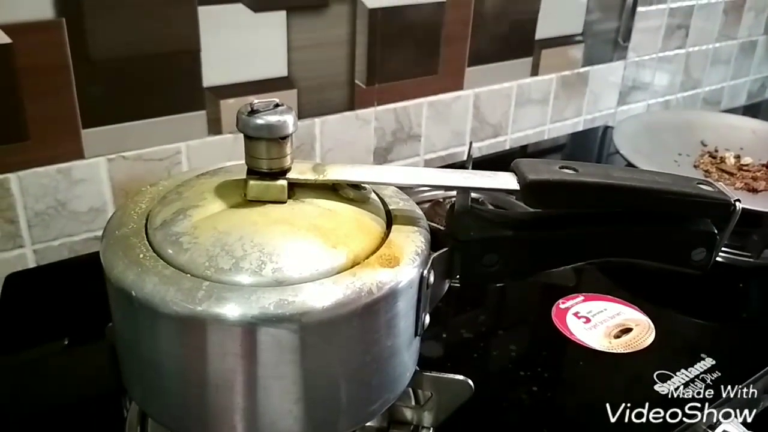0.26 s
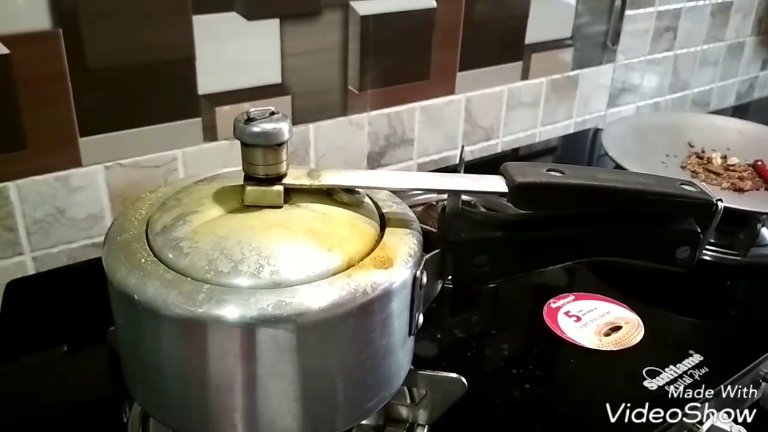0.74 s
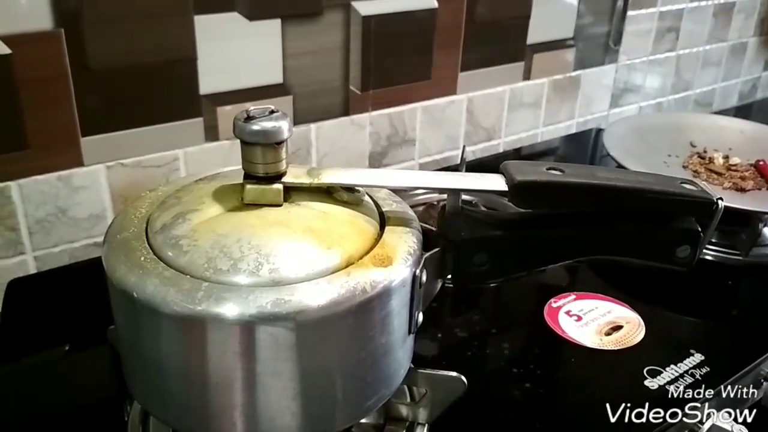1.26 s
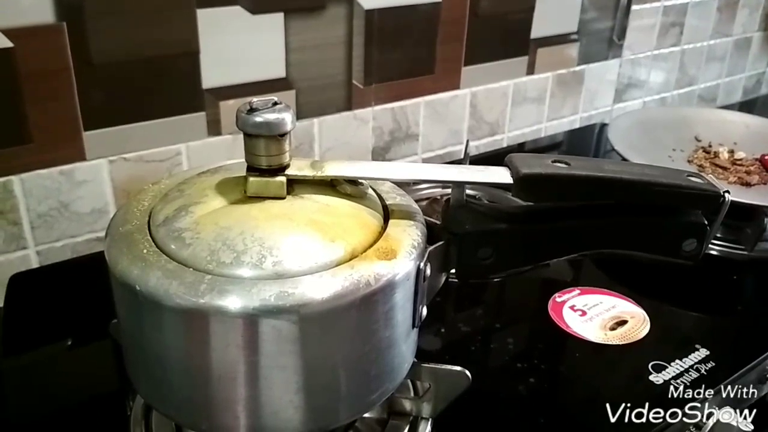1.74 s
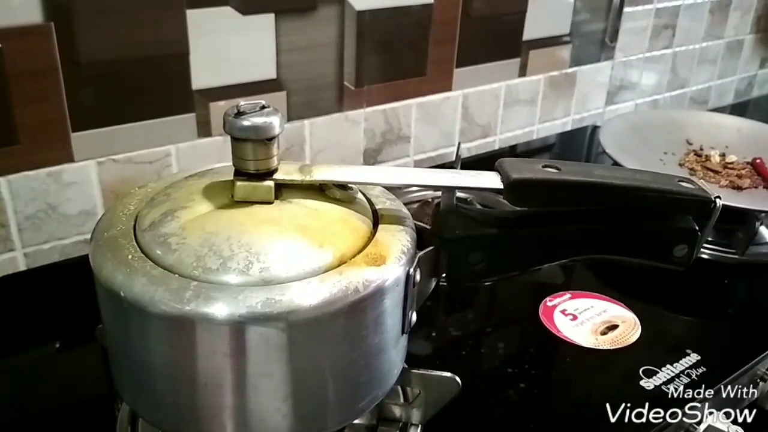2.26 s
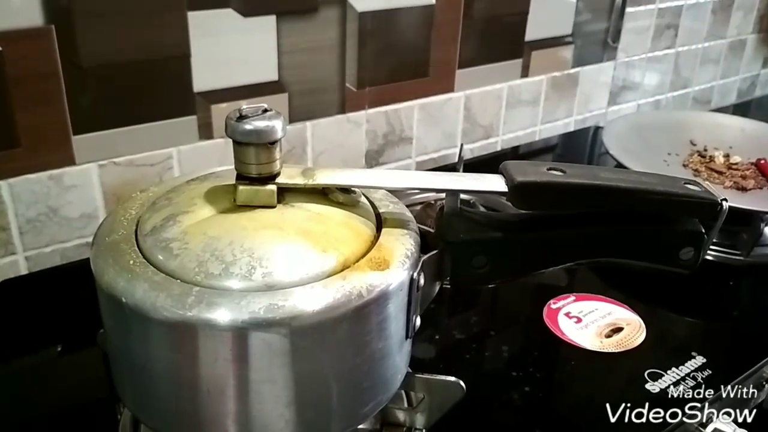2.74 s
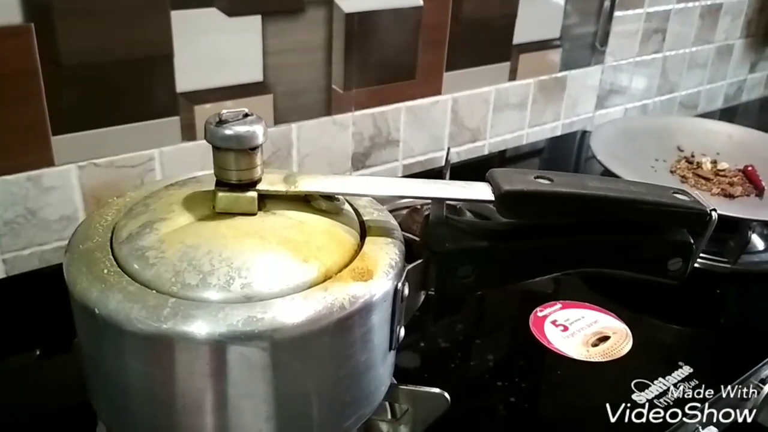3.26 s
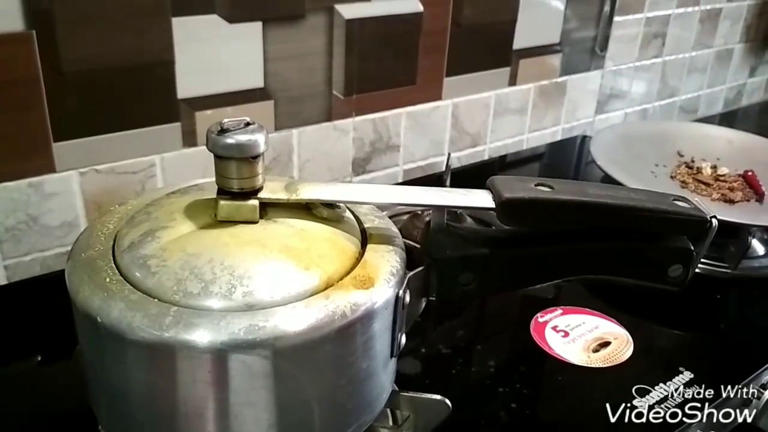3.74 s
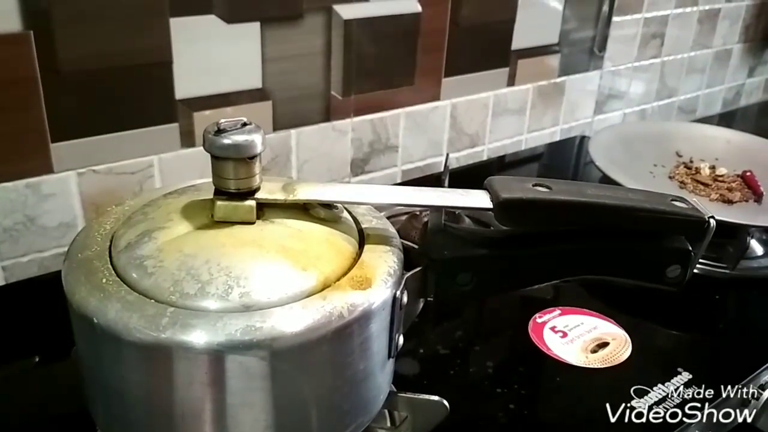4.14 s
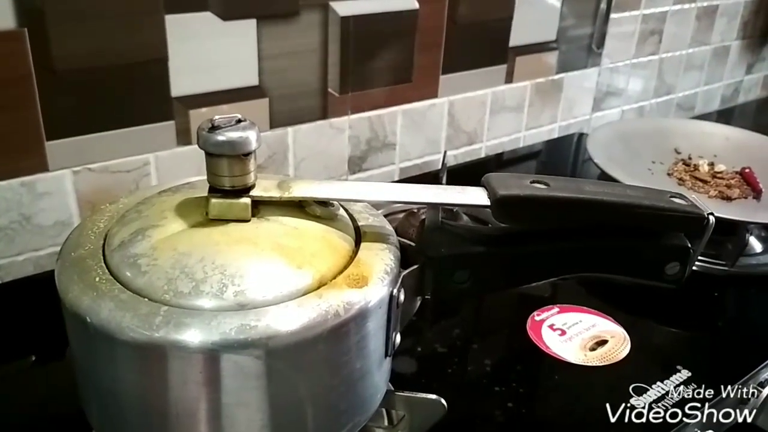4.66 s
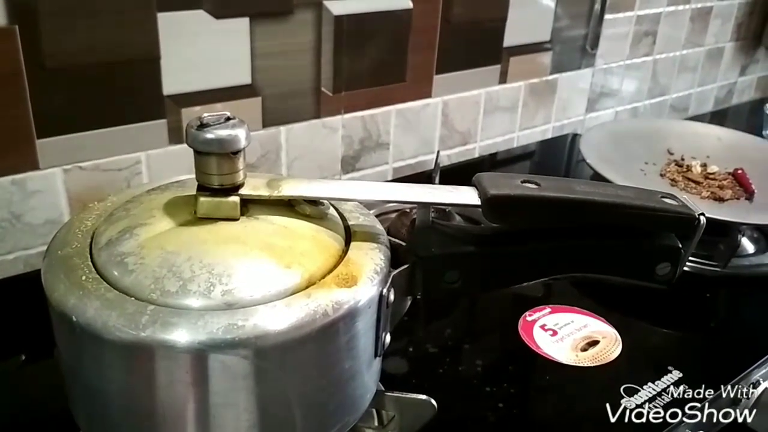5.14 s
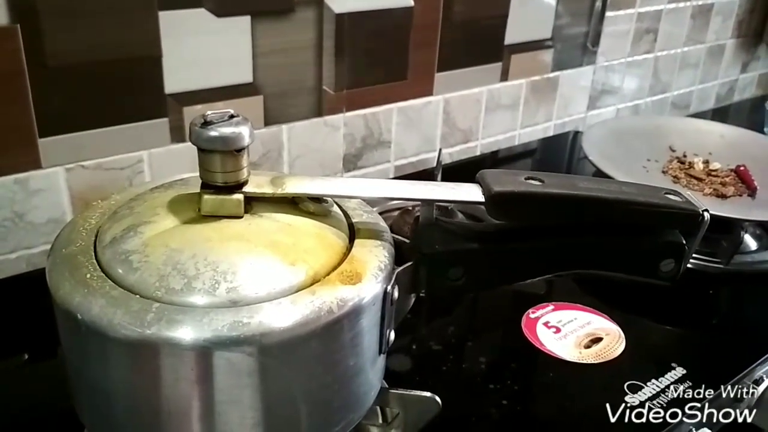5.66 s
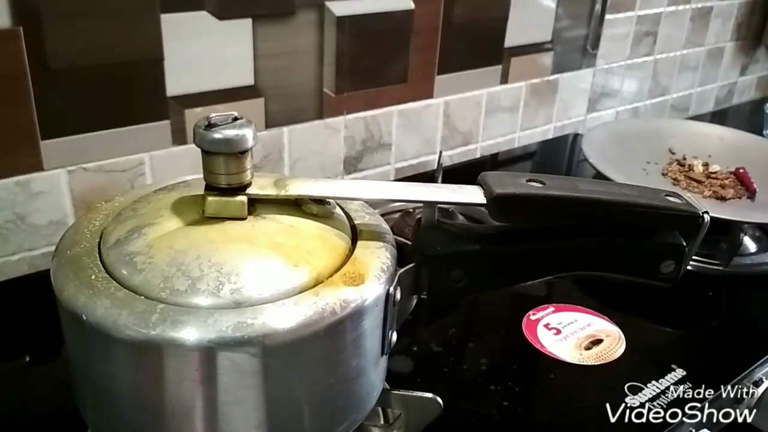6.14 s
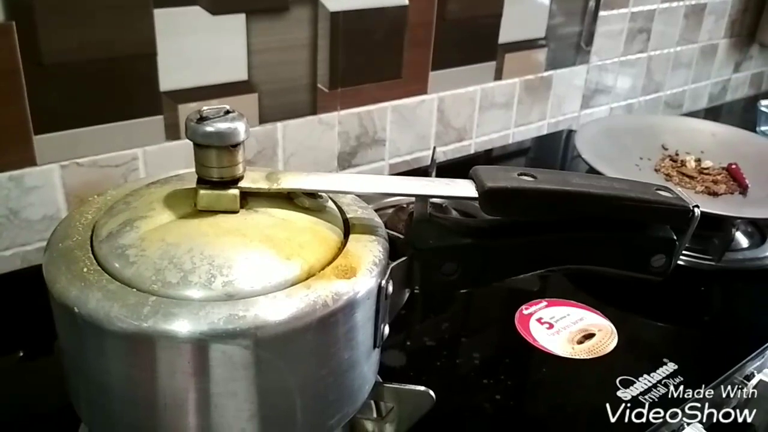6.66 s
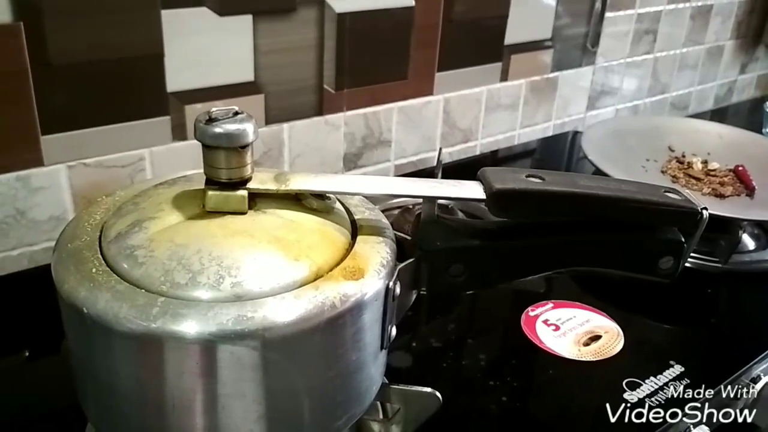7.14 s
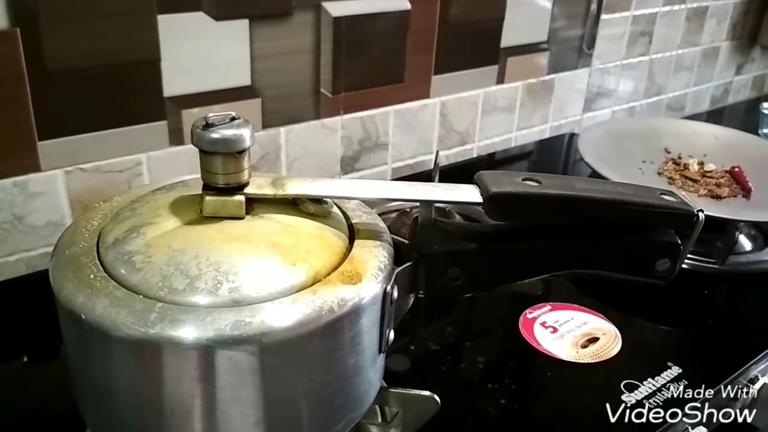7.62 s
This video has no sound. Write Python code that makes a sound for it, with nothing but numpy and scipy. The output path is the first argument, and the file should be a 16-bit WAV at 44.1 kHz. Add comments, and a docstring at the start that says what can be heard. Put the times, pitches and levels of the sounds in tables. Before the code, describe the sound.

From 0 to about 7.9 seconds a pressure cooker releases steam in a continuous, dense, bright hiss, close and wide in stereo, with a broad treble body and a sharp airy band on top. For the first half second it is slightly thinner; then it stays nearly even, swelling a touch from about 4.4 seconds. Underneath, very quietly, a gas flame flutters, tiny low bubbling blips scatter, and room air and rumble flicker with brief dropouts. A soft knock comes at 1.3 seconds. A faint far horn sounds around 2.8 to 3.4 and more clearly at 4.25. Bumps occur near 4.8 and 6.2, and wet spitting puffs at 5.4, 5.9 and 6.6. Dull floor thuds cluster from 6.8 to 7.1, strongest about 6.9, while a distant motor whine rises faintly until the end. The hiss is cut off still running.

```python
"""A tiled kitchen: steam hisses from the weight valve of a pressure cooker, close to a phone with two microphones.
The hiss, wet surges, flame, house rumble and room air are shaped noise whose levels swell and flutter.
Soft low blips are short gliding tones scattered at random; thuds ring the floor with decaying sines.
A far horn and a motor whine are unsteady tones. The low end flickers and a noise suppressor mutes faint cells."""
import sys
import numpy as np
from scipy import signal
from scipy.fft import rfft, irfft, next_fast_len
from scipy.io import wavfile
from scipy.ndimage import uniform_filter1d, map_coordinates

SR = 44100
rng = np.random.default_rng(int(sys.argv[2]) if len(sys.argv) > 2 else 0)


def undo_db(level):
    """Turn decibels back into plain size, where 20 dB means ten times bigger."""
    steps = np.asarray(level, float) / 20
    return 10 ** steps


def generate_wav(sig):
    """Save sig (samples, or channels by samples) to the path in sys.argv[1] as 16-bit PCM at SR."""
    pcm = np.round(np.clip(np.atleast_2d(sig).T, -1, 1) * 32767).astype(np.int16)
    wavfile.write(sys.argv[1], SR, pcm)


N = 347949  # length in samples


def unit(x):
    """Scale to rms 1."""
    return x / np.sqrt(np.mean(x ** 2) + 1e-20)


def along(points, hz):
    """Read (frequency, value) points on a log frequency axis."""
    f, v = np.transpose(points)
    return np.interp(np.log(hz + 1), np.log(f + 1), v)


def curves(rows):
    """One value per sample for each column after the time."""
    s, *cols = np.transpose(rows)
    return [np.interp(np.arange(N) / SR, s, c) for c in cols]


def wobble(rate):
    """A smooth random curve, rate knots a second."""
    return map_coordinates(rng.standard_normal(N // 100), [np.arange(N) * rate / SR])


def filtered(x, response):
    """Shape the spectrum of x by a gain that depends on frequency."""
    m = next_fast_len(N + 8192)
    return irfft(rfft(x, m) * response(np.fft.rfftfreq(m, 1 / SR)), m)[..., :N]


def rush(spectrum, alike, patchy_db):
    """Stereo noise of mid rms 1 with patches of random gain; alike is the left-right likeness."""
    z = signal.stft(rng.standard_normal((2, N)), nperseg=512)[2]
    field = uniform_filter1d(rng.standard_normal(z.shape), size=5, axis=1)
    field = uniform_filter1d(field, size=10, axis=2)
    pair = signal.istft(z * undo_db(patchy_db * unit(field)), nperseg=512)[1][:, :N]
    a, b = filtered(pair, lambda hz: undo_db(along(spectrum, hz)))
    turn = np.arccos(np.clip(alike, -1, 1)) / 2
    common, apart = np.cos(turn) * a, np.sin(turn) * b
    pair = np.array([common + apart, common - apart])
    return pair / np.std(pair.mean(0))


def swells(rows, mean_db, swing_db, rate):
    """Level in dB: the loudest swell of the moment, or else a random murmur with rate knots a second."""
    rise, sag, fall = 518, 30.5, 483  # dB per s: before the start, from the start on, extra after the length
    start_s, length_s, level_db = np.transpose(rows)[..., None]
    t = np.arange(0, N, 64) / SR
    since = t - start_s
    lost_db = rise * np.maximum(-since, 0) + sag * np.maximum(since, 0)
    lost_db = lost_db + fall * np.maximum(since - length_s, 0)
    loudest_db = np.interp(np.arange(N) / SR, t, (level_db - lost_db).max(axis=0))
    return np.maximum(loudest_db, mean_db + swing_db * wobble(rate))


def rippled(x):
    """Kitchen echoes ripple the hiss: narrow, slowly shifting patches of gain, different at each port."""
    ripple_db, top_hz = 2.8, 11000  # depth, and where it fades out
    hz, t, z = signal.stft(x, SR, nperseg=2048)
    field = uniform_filter1d(rng.standard_normal(z.shape), size=3, axis=1)
    field = uniform_filter1d(field, size=6, axis=2)
    depth_db = (ripple_db / (1 + (hz / top_hz) ** 10))[:, None]
    gain_db = depth_db * unit(field) - .1 * depth_db ** 2  # the second term offsets the added power
    return signal.istft(z * undo_db(gain_db), SR, nperseg=2048)[1][:, :N]


# Course of the jet: (time [s], level before trim and flutter [dB], left-right balance before centring [dB])
STEAM_COURSE = [(0.0, -45, -5.5), (1.32, -45, -4.5), (1.45, -43, -5.0), (1.65, -44, -6.0),
                (2.02, -44, -4.5), (2.5, -45, -5.0), (2.77, -43, -4.5), (4.04, -43, -5.5),
                (4.42, -41, -5.5), (4.61, -42, -6.5), (4.9, -42, -4.5), (5.21, -43, -6.5),
                (7.03, -43, -7.5), (7.08, -44, -7.0), (7.45, -42, -7.5), (7.71, -43, -6.5),
                (7.89, -44, -7.5)]
# Colour of the bright jet: (frequency [Hz], relative density [dB per Hz])
JET_COLOUR = [(5060, -34), (8600, -29.5), (9390, -19), (10800, -3), (12000, -0.5), (14500, -7),
              (15700, -20)]
# Colour of the broad hiss around the lid: (frequency [Hz], relative density [dB per Hz])
LID_COLOUR = [(880, -28), (1500, -11), (2170, -4), (2470, -4), (2710, -5), (3090, -4), (3490, 0),
              (3800, -1), (4300, 0), (5050, -1.5), (6020, -5), (6760, -4.5), (7410, 1), (8380, 0.5),
              (9400, -4), (12200, -20.5), (20700, -120)]
# Narrow parts cancelled by walls and lid: (centre [Hz], width [Hz], depth before the overall lift [dB])
WALL_NOTCHES = [(2640, 90, 2), (3110, 110, 2.5), (3800, 140, 2), (4760, 160, 2.5), (5560, 90, 1.5),
                (5950, 280, 3.5), (6480, 110, 2), (6900, 240, 3), (7850, 100, 2.5), (8150, 110, 3),
                (8450, 140, 4), (8610, 70, 4), (9170, 100, 2.5), (9560, 90, 1.5)]
# A reflection hollows the hiss and fills in as the hand drifts: (time [s], depth [dB])
HOLLOW_COURSE = [(0, 3), (2.2, 4), (3.2, 2), (5.5, 0.5), (6.6, -0.5), (7.89, 0.5)]


def steam():
    """Turbulent jet: a bright band from the valve gap and a broad lid hiss; both flutter with the flow."""
    jet_db, pan_db = curves(STEAM_COURSE)
    turn_db = pan_db - np.mean(pan_db)  # the hand turns the phone a little
    # the lid hiss follows the jet, steeper than it moves, and the turning
    lid_db = -51 + 1.39 * (jet_db - np.mean(jet_db)) + 0.36 * turn_db
    flutter_db = .3 * wobble(9)
    sway = undo_db(np.outer([.5, -.5], turn_db))
    jet_db = jet_db - 1.14 + 0.53 * flutter_db + 0.14 * wobble(25)
    jet = undo_db(jet_db) * sway * rush(JET_COLOUR, 0.12, patchy_db=1.0)
    lid_db = lid_db + flutter_db + 0.15 * wobble(25)
    lid = undo_db(lid_db) * rush(LID_COLOUR, 0.034, patchy_db=1.12)

    def echoes(hz):
        """Gain of the wall and lid notches, lifted a little overall."""
        return undo_db(0.56 - sum(db * np.exp(-(2 * (hz - c) / w) ** 2) for c, w, db in WALL_NOTCHES))

    hiss = filtered(jet + lid, echoes)
    hollow_hz, hollow_width_hz = 2957, 654
    hollow = filtered(hiss, lambda hz: np.exp(-(2 * (hz - hollow_hz) / hollow_width_hz) ** 4))
    hollow_gain = undo_db(-curves(HOLLOW_COURSE)[0])
    return rippled(hiss + (hollow_gain - 1) * hollow)


# Spurts at the lid: (start [s], length [s], level before flutter [dB])
LID_SPURTS = [(1.472, 0.039, -68.5), (2.08, 0.015, -70), (3.93, 0.08, -64.5), (4.396, 0.056, -66),
              (4.81, 0.044, -77), (4.883, 0.17, -65), (5.01, 0.3, -65), (5.431, 0.23, -55.5),
              (5.718, 0.064, -64.5), (5.893, 0.12, -59), (6.125, 0.018, -66.5), (6.51, 0.069, -66),
              (6.606, 0.25, -59.5), (7.224, 0.042, -61.5), (7.52, 0.057, -65), (7.588, 0.037, -62.5)]
# Colour of the sputter: (frequency [Hz], relative density [dB per Hz])
SPUTTER_COLOUR = [(700, -62), (950, -14), (1200, -4.5), (1600, -2.5), (2100, -7), (2600, -48)]


def sputter():
    """Steam spits at the lid: mid-band noise in short spurts over a faint murmur."""
    level_db = swells(LID_SPURTS, mean_db=-76, swing_db=4.6, rate=22) + 1.46 * wobble(14)
    return undo_db(level_db) * rush(SPUTTER_COLOUR, 0.21, patchy_db=6.5)


# Rough surges of wet steam: (start [s], length [s], level before flutter [dB])
WET_SURGES = [(6.596, 0.07, -67.5), (6.672, 0.09, -66), (6.757, 0.067, -62), (5.503, 0.092, -65.5),
              (7.298, 0.044, -75), (7.434, 0.09, -69)]
# Colour of the wet steam: (frequency [Hz], relative density [dB per Hz])
WET_COLOUR = [(300, -56), (450, 1.5), (600, -5), (900, 7.5), (1150, 4), (1400, -1.5), (2000, 0),
              (2600, -31)]


def surges():
    """Wet steam surges roughly: noise with a fast level flutter."""
    level_db = swells(WET_SURGES, mean_db=-95, swing_db=1, rate=10) + 2.6 * wobble(76)
    return undo_db(level_db) * rush(WET_COLOUR, 0.39, patchy_db=1.5)


# Level of the blips by pitch: (frequency [Hz], gain [dB])
BLIP_COLOUR = [(150, -2.5), (290, 0.5), (480, -7), (650, -2), (1000, 2.5), (1400, 0.5)]


def blips():
    """Short, slightly gliding soft tones of scattered low pitch, each panned at random."""
    per_s, low_hz, high_hz, mean_life_s = 55, 150.1, 1410, 0.0535
    weakest_db, scatter_db = -79.5, 13  # before the gain by pitch
    t = np.arange(SR // 8) / SR
    rows = rng.random((round(per_s * N / SR), 5))
    out = np.zeros((2, N + SR))
    for when, pitch, life, strength, side in rows:
        hz = low_hz * (high_hz / low_hz) ** pitch
        u = np.minimum(t / (mean_life_s * (.5 + life)), 1)  # 0 to 1 over the blip's life
        blip = np.sin(np.pi * u) ** 2 * np.sin(2 * np.pi * hz * t * (1 + 0.029 * u))
        turn = side * np.pi / 2
        pan = [np.cos(turn), np.sin(turn)]
        level = undo_db(along(BLIP_COLOUR, hz) + weakest_db + scatter_db * strength)
        out[:, round(when * N):][:, :len(t)] += level * np.outer(pan, blip)
    return out[:, :N]


# Flares of the gas flame: (start [s], length [s], level before flutter [dB])
FLAME_FLARES = [(0.71, 0.061, -60), (1.879, 0.032, -66), (2.044, 0.12, -65.5), (2.344, 0.042, -68),
                (2.727, 0.096, -67), (2.857, 0.041, -68.5), (3.145, 0.08, -72.5), (3.254, 0.011, -67.5),
                (3.32, 0.041, -71), (3.617, 0.16, -64.5), (4.38, 0.17, -64.5), (4.858, 0.059, -66.5),
                (5.06, 0.019, -71.5), (5.34, 0.053, -63.5), (5.48, 0.034, -74), (6.157, 0.046, -66.5),
                (6.23, 0.072, -66.5), (6.465, 0.043, -70), (6.596, 0.027, -74), (6.68, 0.03, -79),
                (6.757, 0.051, -73), (6.85, 0.18, -68.5), (7.215, 0.15, -65.5), (7.441, 0.24, -63)]
# Colour of the flame: (frequency [Hz], relative density [dB per Hz])
FLAME_COLOUR = [(200, -49), (350, -7.5), (550, -30.5), (670, -11.5), (740, 3.5), (810, -7.5), (900, -12),
                (1100, -71), (1500, -68)]


def flame():
    """Gas flame: a narrow rush that flares and flutters, mostly unlike at the two ports."""
    level_db = swells(FLAME_FLARES, mean_db=-85.5, swing_db=4.5, rate=21) + 5.05 * wobble(9.7)
    return undo_db(level_db) * rush(FLAME_COLOUR, 0.16, patchy_db=4.5)


# Bumps in the house: (start [s], length [s], level before flutter [dB])
HOUSE_BUMPS = [(0.164, 0.12, -63.5), (0.39, 0.05, -68.5), (0.67, 0.04, -71), (0.973, 0.055, -67),
               (1.3, 0.022, -59), (2.137, 0.013, -60), (2.248, 0.043, -73), (2.303, 0.047, -66),
               (2.398, 0.037, -67), (2.452, 0.034, -69), (2.886, 0.03, -67), (3.302, 0.017, -61),
               (3.4, 0.064, -63.5), (3.96, 0.033, -69.5), (4.17, 0.049, -64), (4.257, 0.041, -64.5),
               (4.545, 0.029, -61.5), (4.699, 0.02, -65.5), (4.815, 0.11, -52), (4.976, 0.059, -59),
               (5.408, 0.071, -63.5), (5.464, 0.079, -69.5), (5.673, 0.11, -62.5), (6.053, 0.021, -69),
               (6.167, 0.064, -58.5), (6.23, 0.046, -55.5), (6.31, 0.14, -66), (6.547, 0.023, -66.5),
               (6.657, 0.063, -56), (6.753, 0.16, -65.5), (7.09, 0.039, -75), (7.193, 0.035, -73),
               (7.231, 0.039, -67.5), (7.417, 0.18, -64), (7.54, 0.053, -68), (7.61, 0.033, -65.5)]
# Colour of the bumps: (frequency [Hz], relative density [dB per Hz])
BUMP_COLOUR = [(110, -32), (170, 0.5), (230, 4.5), (300, 3.5), (380, -18), (520, -45.5)]


def bumps():
    """Bumps in the house: lumps of low noise, largely alike at both ports."""
    level_db = swells(HOUSE_BUMPS, mean_db=-81, swing_db=1.7, rate=12) + 0.2 * wobble(13.0)
    return undo_db(level_db) * rush(BUMP_COLOUR, 0.77, patchy_db=3.5)


# Thuds through the floor: (time [s], level before a 7.5 dB trim [dB])
FLOOR_THUDS = [(1.3, -54), (1.33, -68), (6.779, -43), (6.807, -37), (6.851, -42), (6.891, -30),
               (6.928, -26), (6.961, -41), (7.018, -40), (7.111, -48)]
# What the floor rings with: (mean frequency [Hz], mean level [dB], time to fall 60 dB [s])
FLOOR_MODES = [(71, -5.5, 0.26), (99.7, 5, 0.16), (123.1, 1.5, 0.17), (213.6, -3.5, 0.1)]


def thuds():
    """Each soft blow rings the floor's modes, with strengths and pitches scattered anew."""
    out, t = np.zeros(N + SR), np.arange(SR // 2) / SR
    onset = (1 - np.exp(-t / 0.005)) ** 2  # soft rise, time constant in s
    for s, db in FLOOR_THUDS:
        ring = np.zeros(len(t))
        for hz, level, t60 in FLOOR_MODES:
            decay = undo_db(level + rng.normal(0, 1.3) - 60 * t / t60)
            ring += decay * np.sin(2 * np.pi * hz * rng.normal(1, 0.018) * t)
        out[round(s * SR):][:len(t)] += undo_db(db - 7.5) * ring * onset
    return filtered(out[:N], lambda hz: 1 / (1 + (62 / (hz + 1)) ** 8))  # cut the deepest lows


# Deep rumbles from further off: (start [s], length [s], level before flutter [dB])
FAR_RUMBLES = [(0.173, 0.11, -71.5), (0.276, 0.04, -79), (1.288, 0.094, -69), (2.312, 0.038, -72.5),
               (3.096, 0.069, -69.5), (3.445, 0.06, -76), (3.778, 0.041, -74), (4.056, 0.16, -70.5),
               (4.243, 0.024, -61.5), (4.748, 0.042, -72), (4.87, 0.072, -63), (5.45, .03, -70),
               (5.54, 0.097, -60.5), (6.139, 0.19, -68.5), (6.353, 0.029, -86), (6.538, 0.38, -71),
               (7.15, .06, -70.5), (7.38, 0.094, -72.5), (7.63, 0.2, -74)]
# Colour of the rumbles: (frequency [Hz], relative density [dB per Hz])
RUMBLE_COLOUR = [(25, -50), (55, -25), (75, -5), (100, -3.5), (130, 3), (170, -21.5), (220, -73)]


def rumble():
    """Deep rumbles from further off: lumps of the lowest noise."""
    level_db = swells(FAR_RUMBLES, mean_db=-96, swing_db=2.7, rate=16) + 1.8 * wobble(18)
    return undo_db(level_db) * rush(RUMBLE_COLOUR, 0.5, patchy_db=0.5)


# Colour of the room air: (frequency [Hz], relative density [dB per Hz])
AIR_COLOUR = [(30, -1), (70, -5), (250, -4), (450, -6), (750, -5.5), (1300, -9.5), (1800, -32.5)]


def air():
    """Room air: a low noise bed whose level only wavers."""
    return undo_db(-69 + 1.74 * wobble(19)) * rush(AIR_COLOUR, 0.13, patchy_db=1.5)


def tone(rows, partials):
    """Slightly unsteady partials (multiple, dB) on a pitch curve, silent outside it."""
    hz, db = curves(rows)
    t = np.arange(N) / SR
    phase = 2 * np.pi * np.cumsum(hz * (1 + 0.01196 * wobble(45))) / SR
    sounding = (t > rows[0][0]) & (t < rows[-1][0])
    waver_db = 3.5  # times a random curve
    return sounding * sum(undo_db(db + level + waver_db * wobble(22)) * np.sin(k * phase) for k, level in partials)


# Two blasts of a far horn, each: (time [s], fundamental [Hz], level before the overtone blend [dB])
HORN_BLASTS = [
    [(2.78, 422, -80), (2.85, 414.7, -70.5), (3.0, 424.5, -69), (3.35, 420, -76.5), (3.45, 433, -99)],
    [(4.2, 413, -99), (4.26, 420, -57), (4.44, 424, -70), (4.52, 430, -97)],
]


def horn():
    """Far horn: only the fourth and fifth multiples of its fundamental are sounded."""
    first, second = HORN_BLASTS
    return tone(first, [(4, 6.5), (5, 1.8)]) + tone(second, [(4, -11), (5, 0)])


# Motor whine: (time [s], pitch before a factor of 0.98 [Hz], level before a 0.49 dB lift [dB])
WHINE_COURSE = [(6.8, 1950, -100), (6.95, 1978, -69), (7.15, 1983, -66), (7.4, 2100, -69),
                (7.6, 2210, -60.5), (7.89, 2300, -64.5)]


def whine():
    """Far motor: a single tone that rises as it speeds up."""
    return tone(WHINE_COURSE, [(0.98, 0.49)])


# Lulls of the low end: (middle [s], length [s], depth before a 1 dB lift [dB])
LOW_LULLS = [(0.154, 0.039, 18), (0.619, 0.019, 25), (0.74, 0.013, 22), (1.148, 0.011, 9),
             (1.24, 0.036, 27), (1.466, 0.032, 7), (1.78, 0.053, 30), (1.939, 0.028, 28),
             (2.208, 0.0056, 16), (2.812, 0.032, 16), (2.954, 0.011, 24), (3.233, 0.038, 21),
             (3.594, 0.057, 22), (4.721, 0.013, 4), (4.994, 0.029, 7), (2.775, 0.012, 6), (4.096, 0.02, 15),
             (5.122, 0.014, 5), (5.323, 0.032, 36), (5.898, 0.035, 0), (5.987, 0.047, 20),
             (6.116, 0.024, 19)]


def flickering(x):
    """The low end flickers as one and drops out in the lulls."""
    low_hz, flicker_per_s, flicker_db = 1260, 28, 5
    t = np.arange(0, N, 64) / SR
    mid_s, length_s, depth_db = np.transpose(LOW_LULLS)[..., None]
    lulls_db = (depth_db * np.exp(-(2 * (t - mid_s) / length_s) ** 4)).sum(axis=0)
    lull_db = np.interp(np.arange(N) / SR, t, lulls_db)
    dip_db = lull_db + flicker_db * np.maximum(wobble(flicker_per_s), 0)
    low = filtered(x, lambda hz: 1 / (1 + (hz / low_hz) ** 10))
    return x + (undo_db(1.0 - dip_db) - 1) * low


# Suppressor threshold: (frequency [Hz], density before following and strictness [dB per Hz])
MUTE_BELOW = [(60, -91.5), (300, -96), (700, -96.5), (1200, -96.5), (1700, -96), (2300, -95), (2900, -92.5),
              (4000, -90.5), (5000, -91.5), (6000, -93.5), (7000, -92.5), (8800, -88.5), (10000, -112.5),
              (12000, -100), (14500, -101), (15800, -99)]
# Extra threshold until it settles: (frequency [Hz], rise before each side's share [dB])
EARLY_STRICTNESS = [(1200, 0), (1700, 0.8), (2500, 2), (2900, 4), (3900, 4.5), (4900, 4.5), (5200, 3),
                    (5600, 0.5), (5900, 3), (6500, 1.5), (7100, 0)]
# Floor of gain, let through even when muted: (frequency [Hz], gain [dB])
MUTED_LEAK = [(60, -15.5), (400, -26.5), (1200, -34), (2500, -35.5), (5000, -31.5), (15000, -47)]


def suppress(x):
    """Noise suppressor: mutes cells under a threshold; until it settles it is strict and ducks what passes."""
    settle_s, left_right_share = 0.45, (0.96, 1.9)
    duck = 3.2  # dB lost per dB of strictness
    hz, t, z = signal.stft(x, SR, "cosine", nperseg=2048, scaling="psd")
    power = uniform_filter1d(np.abs(z) ** 2, size=2, axis=1)
    power = uniform_filter1d(power, size=2, axis=2)
    loud_db = 10 * np.log10(uniform_filter1d(power[:, hz > 2700].mean(axis=(0, 1)), size=20))
    # above the low end the threshold follows the level of the treble
    follow_db = np.outer(hz > 2000, loud_db - loud_db.mean() + 0.84)
    strict_db = np.outer(along(EARLY_STRICTNESS, hz), t < settle_s) * np.reshape(left_right_share, (2, 1, 1))
    limit = undo_db(along(MUTE_BELOW, hz)[:, None] + strict_db + follow_db) ** 2
    open_share = 1 / (1 + (limit / (np.abs(power) + 1e-30)) ** 10)
    gain = open_share * undo_db(-duck * strict_db) + undo_db(along(MUTED_LEAK, hz))[:, None]
    return signal.istft(z * gain, SR, "cosine", nperseg=2048, scaling="psd")[1][:, :N]


def scene():
    """All sources at the two ports; thuds and far tones stay clear of the flicker."""
    near = steam() + sputter() + surges() + blips() + flame()
    house = bumps() + rumble() + air()
    return flickering(near + house) + thuds() + horn() + whine()


def roll_off(x):
    """The treble ends steeply here."""
    return signal.sosfilt(signal.butter(12, 15830, fs=SR, output="sos"), x)


# Each microphone port has its own colour: (frequency [Hz], left-right difference [dB])
PORT_COLOUR = [(60, -0.5), (92, 0.5), (140, -1.5), (210, -1), (330, 0.6), (500, 0), (770, -2), (1170, -2.5),
               (1790, 10), (2740, 1.5), (4190, 0.5), (6410, 3.5), (8200, 2), (9810, -10), (15000, -0.5)]


def record(dry):
    """Colour the sound at each port, suppress the noise and deliver the finished mix."""
    ports = filtered(dry, lambda hz: undo_db(np.outer([.5, -.5], along(PORT_COLOUR, hz))))
    mix = suppress(ports)
    return roll_off(mix)


dry = scene()
out = record(dry)
generate_wav(out)
```